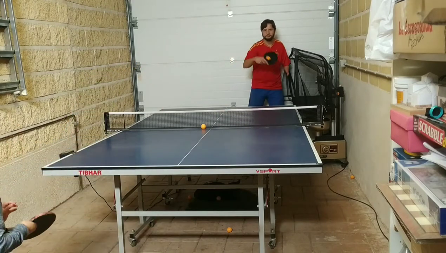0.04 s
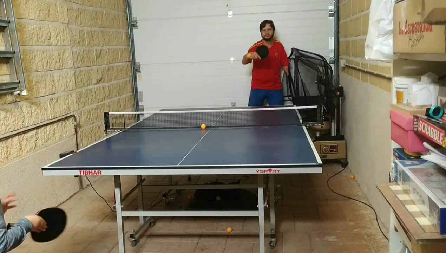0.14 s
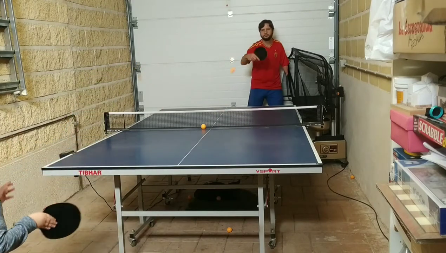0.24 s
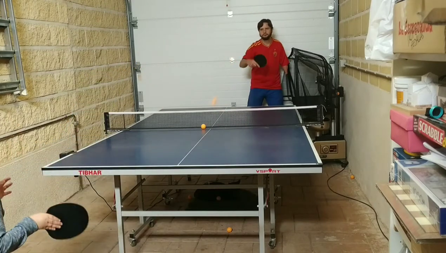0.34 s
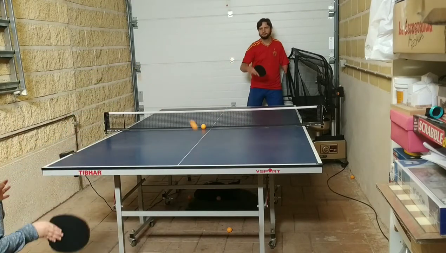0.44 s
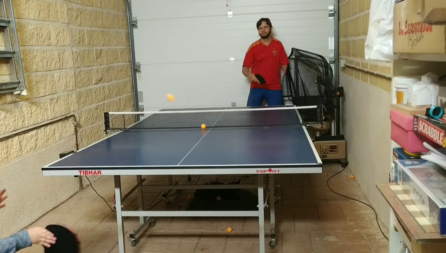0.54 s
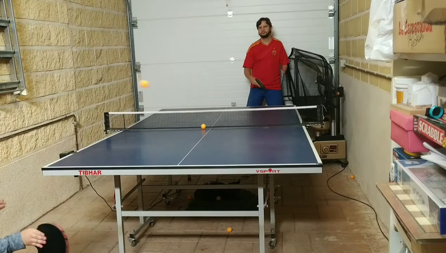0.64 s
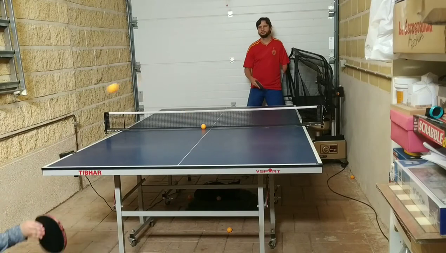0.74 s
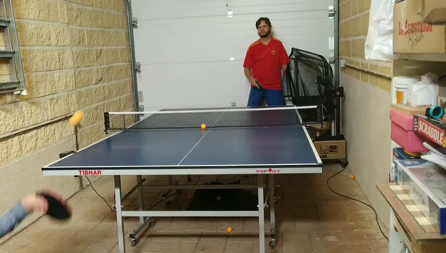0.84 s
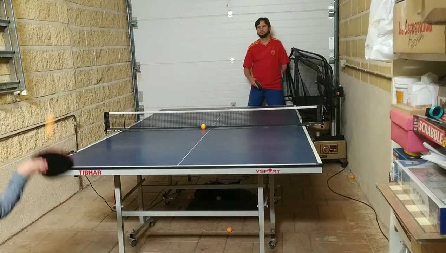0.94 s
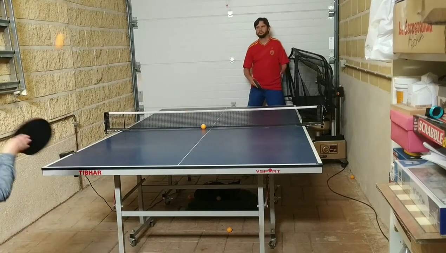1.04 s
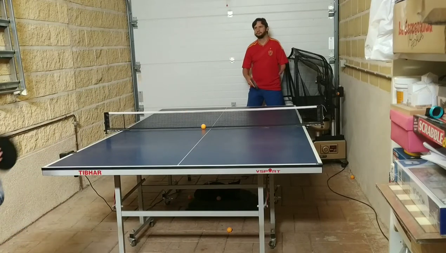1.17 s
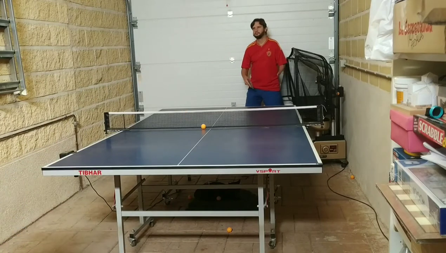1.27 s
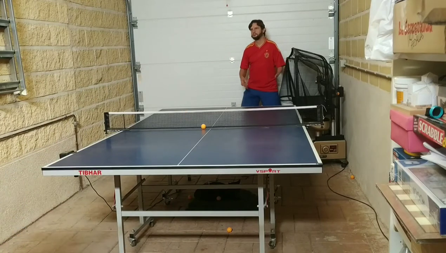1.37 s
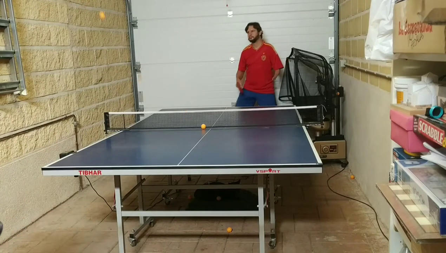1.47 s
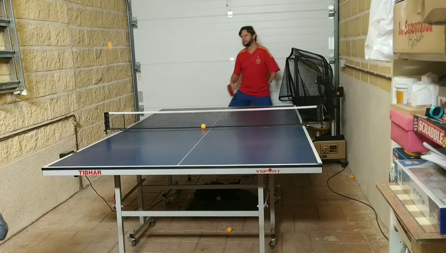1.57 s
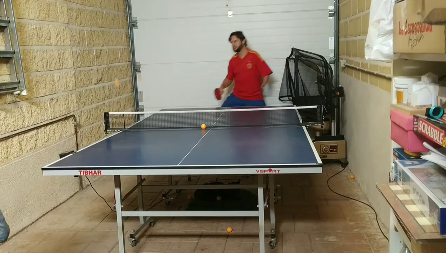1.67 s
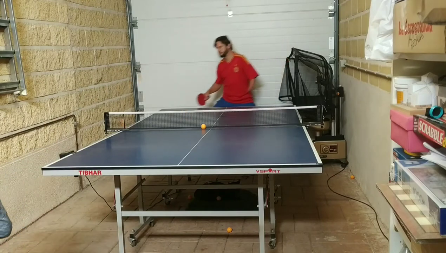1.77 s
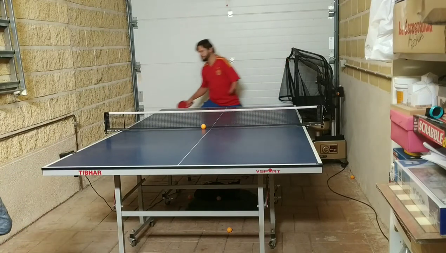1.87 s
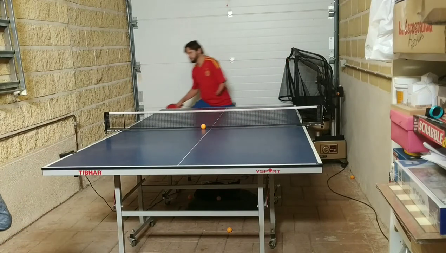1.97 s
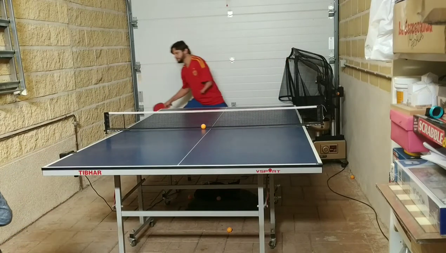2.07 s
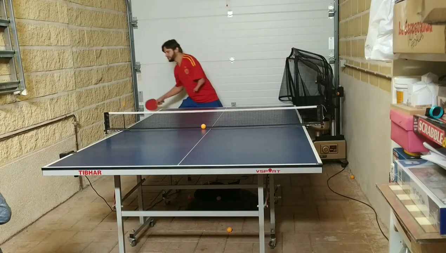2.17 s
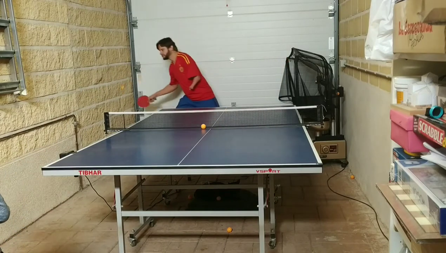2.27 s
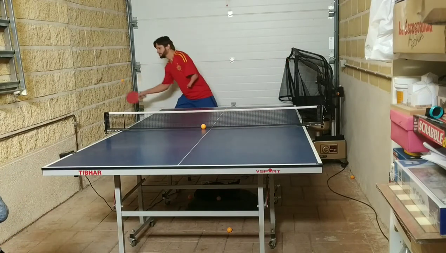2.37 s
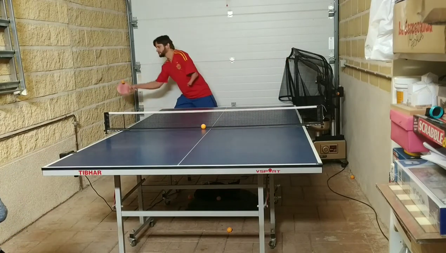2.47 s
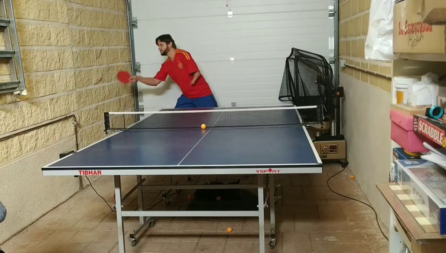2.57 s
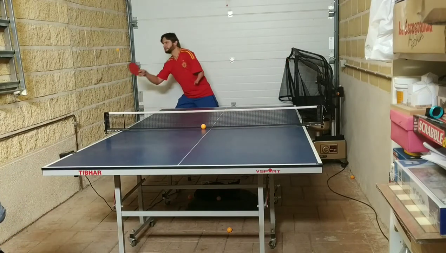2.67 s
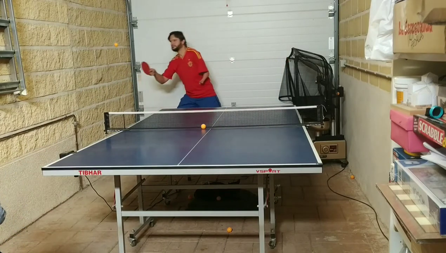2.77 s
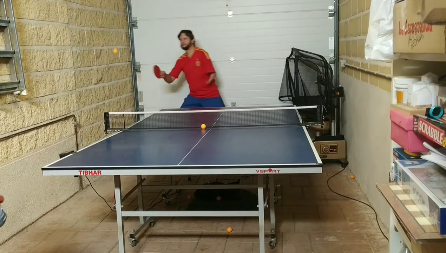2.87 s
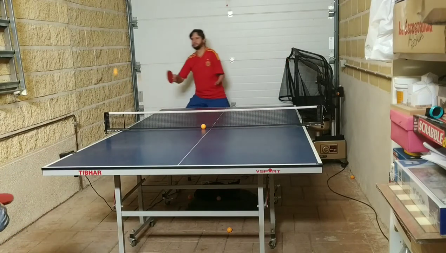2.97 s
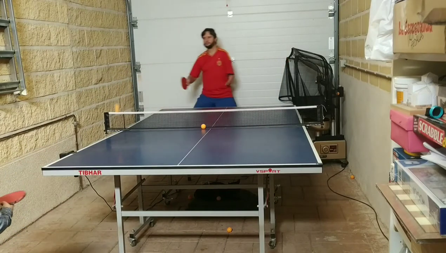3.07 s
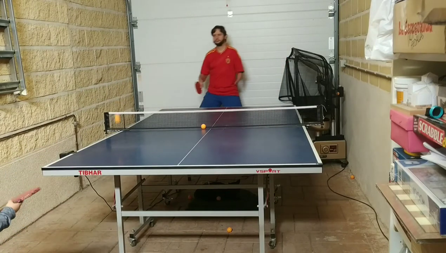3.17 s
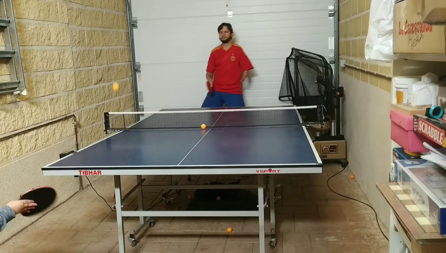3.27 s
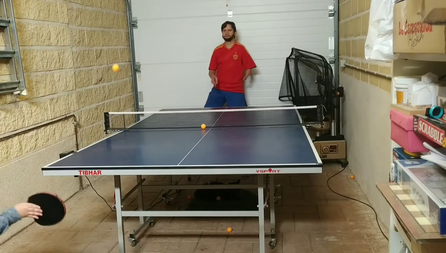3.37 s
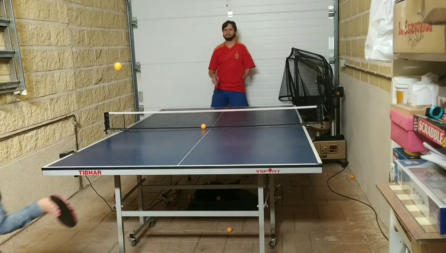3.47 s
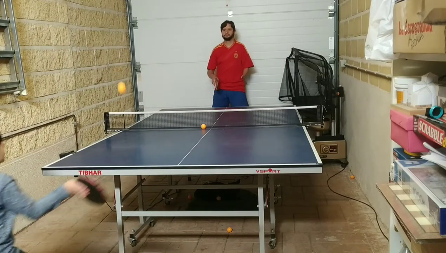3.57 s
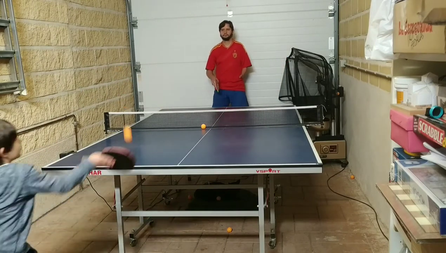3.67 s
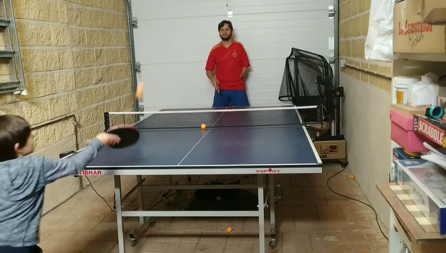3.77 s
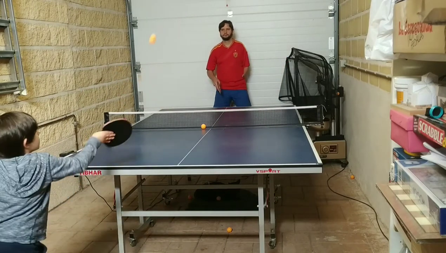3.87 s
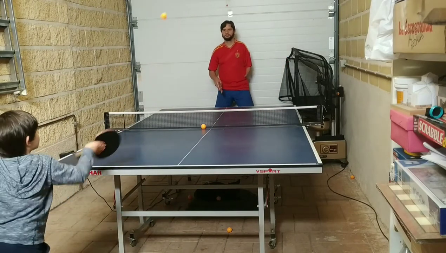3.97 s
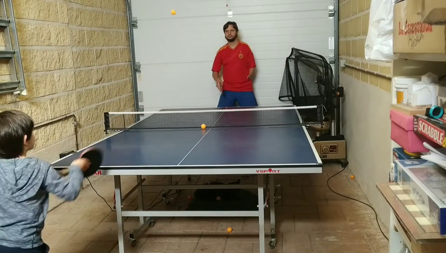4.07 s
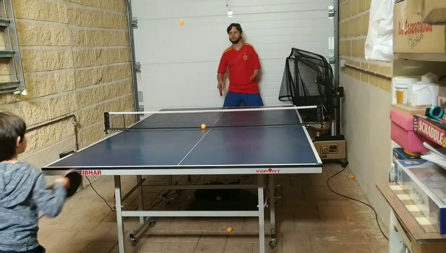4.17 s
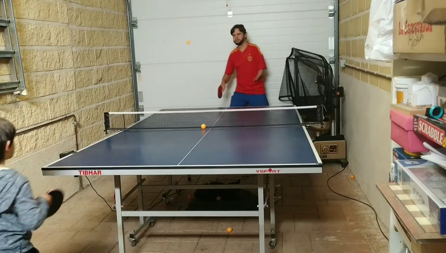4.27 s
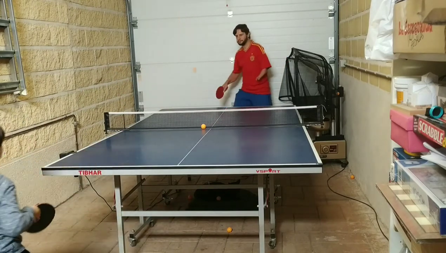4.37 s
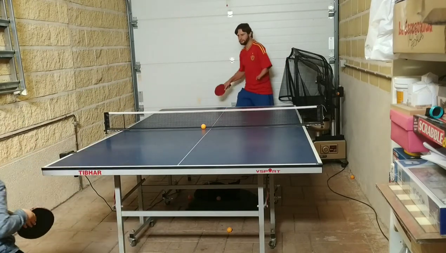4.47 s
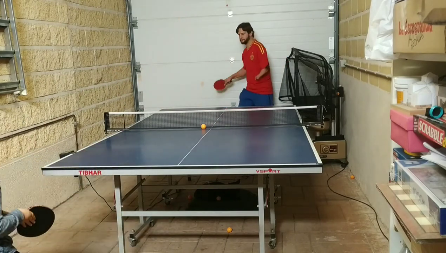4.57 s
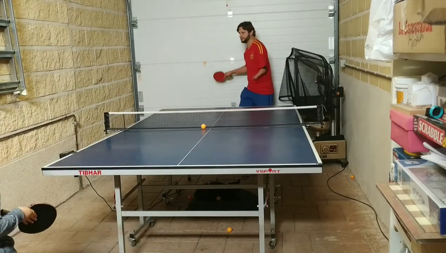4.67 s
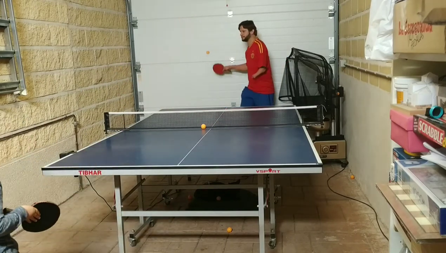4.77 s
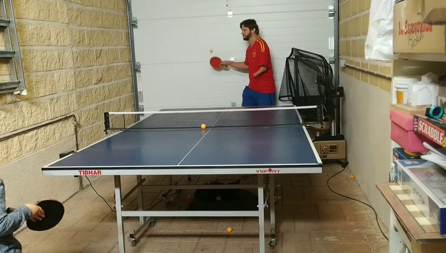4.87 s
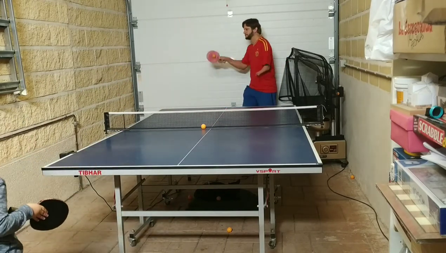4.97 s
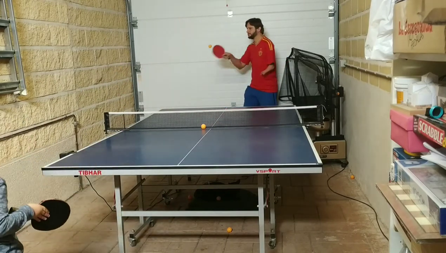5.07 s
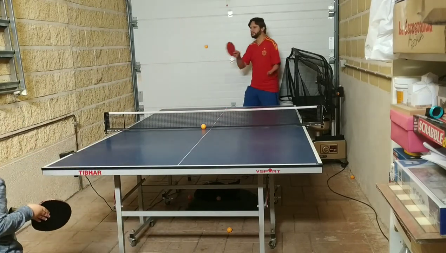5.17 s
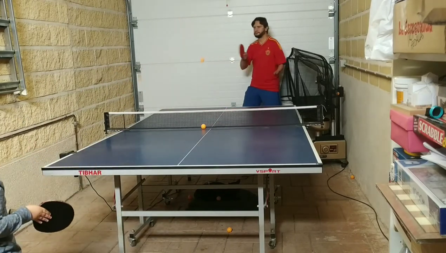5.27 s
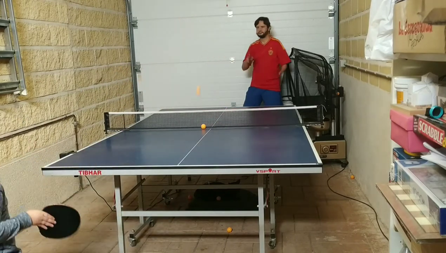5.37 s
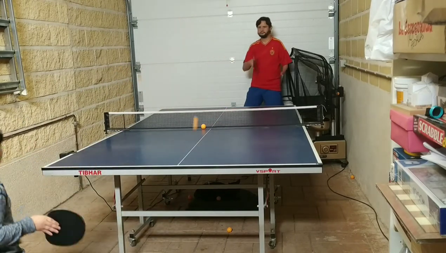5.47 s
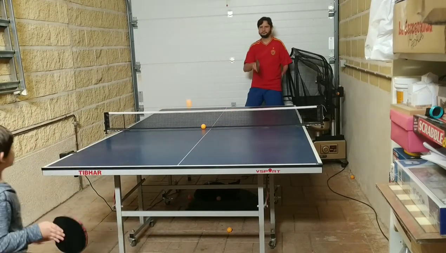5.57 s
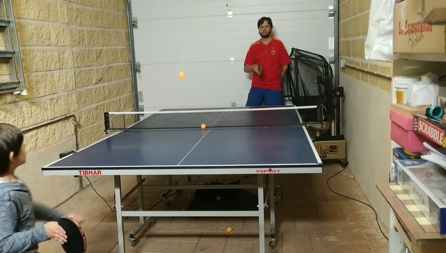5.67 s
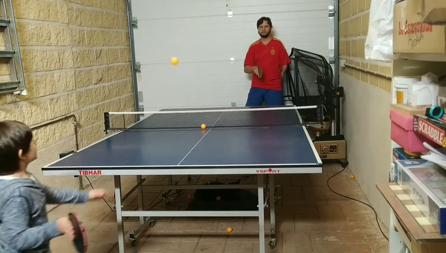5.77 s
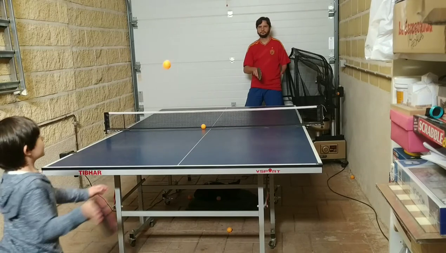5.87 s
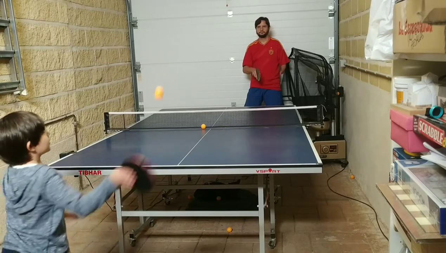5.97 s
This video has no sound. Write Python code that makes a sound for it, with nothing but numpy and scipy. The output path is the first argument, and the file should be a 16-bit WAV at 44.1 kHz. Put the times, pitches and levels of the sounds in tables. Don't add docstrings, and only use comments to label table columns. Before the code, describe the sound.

A ping-pong rally heard from the near end of the table in a small garage. Bright, ringing bounces on the table alternate with softer woody paddle knocks, each followed by about half a second of hard-walled echo. Midway, rubber soles scrape, squeak and thump on gritty concrete as the players move. Low floor rumble lies underneath, and a noise gate drops quiet moments to almost nothing.

```python
import sys
import numpy as np
from scipy import signal
from scipy.fft import rfft, irfft
from scipy.io import wavfile
from scipy.ndimage import uniform_filter1d, minimum_filter1d

SR = 44100
rng = np.random.default_rng(int(sys.argv[2]) if len(sys.argv) > 2 else 0)


def volts_from_decibels(level):
    exponent = np.asarray(level, float) / 20
    return 10 ** exponent


def wav_record(signal):
    frames = np.transpose(np.atleast_2d(signal))
    bounded = np.clip(frames, -1, 1)
    quanta = np.round(bounded * 32767).astype(np.int16)
    wavfile.write(sys.argv[1], SR, quanta)


N = 265923


def rms_one(x):
    return x / np.sqrt(np.mean(x ** 2) + 1e-20)


def at_hz(points, hz):
    points_hz, values = np.array(points)[:, :2].T
    return np.interp(np.log(hz), np.log(points_hz), values)


def band(x, low_hz, high_hz):
    return signal.sosfilt(signal.butter(2, [low_hz, high_hz], "band", fs=SR, output="sos"), x)


def drift(rate_hz, size):
    knots = rng.standard_normal(size // 64 + 500)
    r = np.exp(-128 * np.pi * rate_hz / SR)
    slow = signal.lfilter([1], [1, -2 * r, r * r], knots)[400:]
    return np.interp(np.arange(size) / 64, np.arange(len(slow)), rms_one(slow))


def swell(t, peak_s, swell_s, fade_s, level_db):
    part = (t - peak_s) / np.where(t < peak_s, swell_s, fade_s)
    return volts_from_decibels(level_db - 20 * part ** 2)


def swells(rows):
    t = np.arange(0, N + 64, 64) / SR
    power = sum(swell(t, *row) ** 2 for row in rows)
    return np.interp(np.arange(N) / SR, t, np.sqrt(power))


def trailing(x, seconds):
    size = round(seconds * SR)
    return uniform_filter1d(x, size, origin=(size - 1) // 2)


# pitch_hz, side_minus_mid_db
PORT_SPREAD = [(60, -12), (125, -35), (250, -13), (500, -11.5), (1000, -3.5), (2500, 0.5), (6000, 0),
               (14000, -1)]


def diffuse(size, gain_of_band):
    edges_hz = 40 * 2 ** np.arange(0, 9, .4)
    white = rng.standard_normal((2, 2, size))
    out = 0
    for k, (low_hz, high_hz) in enumerate(zip(edges_hz, edges_hz[1:])):
        mid, side = band(white[k % 2], low_hz, high_hz)
        hz = np.sqrt(low_hz * high_hz)
        wide = volts_from_decibels(at_hz(PORT_SPREAD, hz))
        stereo = (mid + wide * side * [[1], [-1]]) / np.sqrt(1 + wide ** 2)
        out = out + gain_of_band(hz) * stereo
    return out


# start_s, peak_db, body_db, shell_db, direct_over_echoes_db
BOUNCES = [
    (.4718, -11, -13.5, -9, -5),
    (3.1337, -6, -17, -12.5, -2.5),
    (4.537, -6, -14.5, -11.5, -0.3),
    (5.498, -9.5, -12.5, -6, -9),
]
EDGE_BOUNCE = [
    (1.961, -6.5, -23, -6.5, -0.6),
]
# pitch_hz, width_hz, level_db
TABLE_TOP = [(136, 170, -6.5), (260, 60, 3.5), (305.7, 63, 4), (510, 260, 0.5), (770, 210, 3),
             (1220, 650, -1), (2205, 550, -0.5), (3470, 820, -9), (5610, 1500, -14)]
TABLE_EDGE = [(250, 170, -16.5), (496, 180, -11), (747, 180, -5), (1140, 360, 0), (1920, 900, 1.5),
              (2624, 950, -1.5), (3720, 820, 0), (6260, 580, -5)]
BALL_EDGE_ON = [(8153, 650, 1.5), (8464, 760, 0), (9700, 700, -4.5), (10900, 990, -4), (12070, 1000, -6.5),
                (13600, 810, -16), (15170, 1400, -20.5)]


def table_bounces():
    flat = contacts(BOUNCES, TABLE_TOP, trim_db=21.0, tilt_db=0.56)
    return flat + contacts(EDGE_BOUNCE, TABLE_EDGE, trim_db=22.0, tilt_db=0.9, ball=BALL_EDGE_ON)


# start_s, peak_db, body_db, shell_db, direct_over_echoes_db
FAR_STROKES = [
    (.0447, -22, -6.5, -12, -4.5),
]
FAR_DRIVE = [
    (5.0057, -22, -6.5, -10, 1.4),
]
FAR_BACKHAND = [
    (2.4975, -26.5, -7.5, -6.5, -2.13),
]
# pitch_hz, width_hz, level_db
FAR_PADDLE = [(265, 210, -14.5), (582, 81, -7), (737, 55, 7), (1030, 340, -3), (1419, 390, -6.5),
              (2730, 1900, -15), (4600, 6500, -18.5)]
PADDLE_BACK = [(251, 280, -9), (543, 103, -0.5), (747, 57, 2.5), (1050, 205, -2.5), (1400, 250, -7.5),
               (2700, 1640, -15), (4450, 4700, -16), (5980, 550, -12.5)]


def far_paddle():
    strokes = contacts(FAR_STROKES, FAR_PADDLE, trim_db=17.5, tilt_db=-0.05)
    drive = contacts(FAR_DRIVE, FAR_PADDLE, trim_db=17, tilt_db=0.57)
    return strokes + drive + contacts(FAR_BACKHAND, PADDLE_BACK, trim_db=16, tilt_db=1.2)


# start_s, peak_db, body_db, shell_db, direct_over_echoes_db
NEAR_STROKES = [
    (.9497, -20.5, -8.5, -7, 1.8),
]
NEAR_REACH = [
    (3.7398, -17.5, -10.5, -11.5, -1.5),
]
# pitch_hz, width_hz, level_db
NEAR_PADDLE = [(252, 172, -15.5), (608, 98, 1), (1105, 260, -2), (1814, 2800, -13), (3810, 1400, -8.5),
               (5560, 1870, -15)]
PADDLE_TIP = [(305, 204, -12.5), (566, 260, -6.5), (1015, 290, 3), (1540, 530, -3), (2570, 1100, -10.5),
              (4060, 500, -9.5), (6050, 2500, -15)]


def near_paddle():
    strokes = contacts(NEAR_STROKES, NEAR_PADDLE, trim_db=16, tilt_db=-0.2)
    return strokes + contacts(NEAR_REACH, PADDLE_TIP, trim_db=15.0, tilt_db=0.6)


# pitch_hz, width_hz, level_db
BALL_SHELL = [(7370, 1300, -13.5), (8250, 240, -7.5), (8733, 260, 1.4), (9860, 150, -5.5),
              (10560, 580, -5.5), (12430, 1200, -10.5), (13600, 800, -16), (15000, 900, -28)]
# start_s, level_db, left_minus_right_db
ECHOES = [(0.477, -2, 0), (0.4933, 5, 6.5), (0.96, -16, 6), (1.976, 0.2, 6), (1.9833, -9, 6),
          (3.134, 8, 9.5), (3.1403, 6, 1), (3.746, -7, 4.5), (4.552, 3, 4), (5.504, -1.5, 7),
          (5.518, -1, 5)]


def contacts(rows, body, trim_db, tilt_db, ball=BALL_SHELL):
    out = np.zeros((2, N + SR))
    for start_s, peak_db, body_db, shell_db, direct_db in rows:
        shell = volts_from_decibels(shell_db + 17.5) * knock(ball, 0, scatter_db=0.96, count=2)
        blow = shell + volts_from_decibels(body_db + trim_db) * knock(body, tilt_db, scatter_db=0.43)
        heard = signal.fftconvolve(garage(direct_db), blow[None])
        for echo_s, echo_db, pan_db in ECHOES:
            if 0 < echo_s - start_s < .05:
                echo = np.convolve(shell, scattered())
                late = round((echo_s - start_s) * SR)
                heard[:, late:late + len(echo)] += echo * volts_from_decibels(echo_db + pan_db * np.array([[.5], [-.5]]))
        at = round(start_s * SR)
        out[:, at:at + heard.shape[1]] += volts_from_decibels(peak_db) * heard
    return out[:, :N]


def knock(modes, tilt_db, scatter_db, count=1):
    click = np.eye(1, 2048)[0]
    plain, out = 0, 0
    for k, (hz, width_hz, level_db) in enumerate(modes):
        r = np.exp(-np.pi * width_hz * count / SR)
        zeros = (1 - r * r) / 2 * np.array([1, 0, -1])
        poles = [1, -2 * r * np.cos(2 * np.pi * hz / SR), r * r]
        ring = click
        for _ in range(count):
            ring = signal.lfilter(zeros, poles, ring)
        ring = ring * volts_from_decibels(level_db + scatter_db * rng.standard_normal()) * (-1) ** k
        plain = plain + ring
        out = out + ring * volts_from_decibels(tilt_db * np.log2(hz / 800))
    return out / np.sqrt(np.sum(plain ** 2))


def scattered():
    spread = rng.standard_normal(96) * np.exp(-np.arange(96) / SR / .0007)
    return spread / np.sqrt(np.sum(spread ** 2))


# pitch_hz, t60_s
GARAGE_T60 = [(100, 0.65), (400, 0.41), (1000, 0.4), (2800, 0.4), (7300, 0.35), (14000, 0.24)]


def garage(direct_db):
    t = np.arange(round(.55 * SR)) / SR
    lumps = volts_from_decibels(2.5 * np.exp(-t / 0.083) * drift(160, len(t)))
    build_up = volts_from_decibels(2.5 - 5.5 * np.exp(-t / 0.02)) * (1 - np.exp(-t / 0.0013))
    tail = diffuse(len(t), lambda hz: volts_from_decibels(-60 * t / at_hz(GARAGE_T60, hz)))
    out = tail * lumps * build_up * 0.11
    out[:, 0] += volts_from_decibels(direct_db)
    return out


# peak_s, swell_s, fade_s, level_db, brightness_db_per_octave
SLIDES = [(.76, 0.047, 0.15, -62.5, 1), (.882, 0.052, 0.016, -63.5, -4), (1.168, 0.025, 0.013, -56, -5.5),
          (1.285, 0.021, 0.14, -54.5, -1.5), (1.37, 0.13, 0.12, -51.5, -1.6), (1.49, 0.055, .27, -49.5, 1),
          (1.77, 0.15, .2, -47, -1.4), (2.05, 0.13, 0.3, -38, 2.8), (2.27, .2, 0.1, -44, 2.5),
          (2.731, .1, 0.13, -40.5, -0.1), (3.051, 0.12, 0.097, -57.5, 0.3), (3.441, 0.04, 0.13, -48.5, 1.3),
          (3.546, 0.052, 0.13, -46.5, -2.4), (3.68, 0.098, 0.08, -64.5, -3), (3.929, 0.087, 0.067, -65, 2),
          (4.15, 0.016, .04, -61.5, 1), (4.221, 0.082, .13, -56, -1.5), (4.37, 0.049, 0.1, -51.5, -1.2),
          (4.508, 0.04, 0.15, -34.5, 0.7), (4.7, 0.077, 0.13, -45, -2), (5.275, .021, 0.019, -71, 3),
          (5.365, 0.024, 0.029, -63, 1), (5.856, 0.0099, 0.028, -57, 1), (5.979, .021, .05, -64, -3.5)]
# pitch_hz, level_db_per_hz
GRIT = [(410, -28.5), (700, -15.5), (1280, -6.5), (1400, -5), (2200, -3.5), (2410, -3), (7660, 1),
        (14600, -10.5), (16200, -21)]


def slides():
    out = np.zeros((2, N))
    for peak_s, swell_s, fade_s, level_db, tilt_db in SLIDES:
        a = round((peak_s - .3) * SR)
        t = np.arange(a, min(a + SR, N)) / SR
        t = t[t < peak_s + .6]

        def grit_gain(hz):
            return volts_from_decibels(at_hz(GRIT, hz) + tilt_db * np.log2(hz / 5000) + 0.57 * drift(25, len(t)))

        grit = rms_one(diffuse(len(t), grit_gain))
        out[:, a:a + len(t)] += swell(t, peak_s, swell_s, fade_s, level_db) * grit
    return out


# peak_s, swell_s, fade_s, level_db
STEPS = [(.78, .03, 0.18, -70.5), (1.168, 0.027, 0.021, -76.5), (1.33, 0.087, 0.11, -64.5),
         (1.65, 0.45, .15, -65), (1.8, 0.044, 0.16, -49.5), (1.918, 0.059, 0.088, -50.5),
         (2.08, 0.15, 0.12, -59.5), (2.3, 0.22, 0.11, -62.5), (.88, 0.037, 0.013, -64.5),
         (2.62, 0.056, 0.076, -73), (2.86, 0.13, 0.12, -67.5), (3.01, 0.024, 0.16, -57.5),
         (3.43, 0.053, 0.12, -51), (3.6, 0.12, 0.11, -66.5), (3.93, 0.068, 0.045, -64.5),
         (4.15, .015, 0.025, -59), (4.178, .012, 0.066, -58), (4.26, 0.099, 0.077, -57.5),
         (4.42, 0.18, 0.036, -67), (4.69, 0.096, 0.057, -53), (5.81, .04, 0.065, -63)]
# pitch_hz, level_db_per_hz
THUD = [(53, -23.5), (90, -1.5), (329, -0.5), (479, -8), (682, -4), (970, -6), (1290, -5), (1500, -10),
        (1950, -48.5), (3300, -120)]


def steps():
    thud = diffuse(N, lambda hz: volts_from_decibels(at_hz(THUD, hz) + 2.5 * drift(14, N)))
    return swells(STEPS) * rms_one(thud)


# start_s, length_s, pitch_hz, level_db
CATCHES = [
    (1.33, 0.098, 733, -61),
    (1.63, 0.095, 1126, -55),
    (1.75, 0.067, 845, -57.5),
    (1.89, 0.054, 680, -50),
    (5.853, .015, 5000, -63),
    (2.69, 0.15, 1050, -59),
    (2.83, 0.18, 197.4, -64.5),
    (2.995, 0.051, 313, -56.5),
    (4.168, 0.04, 376, -58),
]


def catches():
    out = np.zeros(N)
    for start_s, length_s, hz, level_db in CATCHES:
        rub = band(rng.standard_normal(8192), hz * 0.57, hz * 1.07)
        rub = band(rub, hz * 1.0, hz * 1.1)[2048:]
        phase = np.arange(len(rub)) / SR / length_s
        at = round(start_s * SR)
        out[at:at + len(rub)] += volts_from_decibels(level_db + 8.5) * rms_one(rub) * 4 * phase * np.exp(-4 * phase)
    return out


# peak_s, swell_s, fade_s, level_db
LUNGES = [(.52, 0.1, .13, -51), (.74, 0.16, 0.13, -59), (1.11, 0.45, 0.038, -58), (1.31, 0.094, .07, -65),
          (1.86, 0.11, 0.64, -56), (2.15, .2, 0.23, -67.5), (3.1, 0.21, 0.55, -60), (3.6, .4, 0.14, -57),
          (3.85, 0.18, 0.074, -56.5), (4.19, 0.06, 0.65, -57.5), (4.77, .2, 0.11, -56.5),
          (5.54, 0.087, 0.16, -54.5)]


def rumble():
    white = rng.standard_normal((3, N))
    mid, side = band(band(white[:2], 5.3, 34), 3.8, 110)
    hum = volts_from_decibels(-13.5) * rms_one(band(band(white[2], 185, 215), 170, 230))
    low = rms_one(mid) + hum + .28 * rms_one(side) * [[1], [-1]]
    return np.hypot(volts_from_decibels(-65.5), swells(LUNGES)) * low


# pitch_hz, level_db_per_hz
ROOM_TONE = [(100, -2.5), (300, -7), (1000, -7.5), (3000, -7), (8000, -10), (16000, -9)]


def room_tone():
    return volts_from_decibels(-66) * rms_one(diffuse(N, lambda hz: volts_from_decibels(at_hz(ROOM_TONE, hz))))


# pitch_hz, level_db_per_hz
HISS = [(29, -30), (50, 3), (108, -4.5), (681, -26), (847, -18), (1710, -21), (6950, -22.5), (11500, -23.5),
        (13300, -29.5), (16200, -28)]


def background():
    flutter_db = 4 * np.tanh(drift(25, N))
    return volts_from_decibels(-81 + flutter_db) * rms_one(diffuse(N, lambda hz: volts_from_decibels(at_hz(HISS, hz))))


def scene():
    ball = table_bounces() + far_paddle() + near_paddle()
    shoes = slides() + steps() + catches()
    return ball + shoes + rumble() + room_tone()


# pitch_hz, left_minus_right_db
LEFT_LEAN = [(60, 0.5), (110, -0.5), (200, 0.5), (380, -0.5), (700, -1), (1290, 0), (2380, -1.5),
             (4400, -0.5), (8120, 1.5), (15000, 1.5)]


def two_ports(dry):
    hz = np.fft.rfftfreq(N, 1 / SR) + 1
    lean = volts_from_decibels(at_hz(LEFT_LEAN, hz) * np.array([[.5], [-.5]]))
    lag = np.exp(-2j * np.pi * hz * np.array([[.0002], [0]]))
    return irfft(rfft(dry) * lean * lag, N)


def noise_gate(ports):
    threshold_db, ratio, depth_db, listen_s = -56, 2.3, 38, 0.02
    rumble_depth_db, rumble_s = 13, .04
    low = signal.sosfiltfilt(signal.butter(2, 55, fs=SR, output="sos"), ports)
    high = ports - low
    power = trailing(np.mean(high ** 2, axis=0), listen_s)
    level_db = 10 * np.log10(np.abs(power) + 1e-14)
    shut_db = np.clip(ratio * (threshold_db - level_db), 0, depth_db)
    gain = volts_from_decibels(-uniform_filter1d(minimum_filter1d(shut_db, size=200), size=200))
    low_gain = volts_from_decibels(-trailing(np.minimum(shut_db, rumble_depth_db), rumble_s))
    return low_gain * low + gain * high


def dropouts(x, share, depth_db):
    hz, _, cells = signal.stft(x, SR, nperseg=1024)
    chance = uniform_filter1d(rng.standard_normal(cells.shape[1:]), size=6, axis=0)
    chance = uniform_filter1d(chance, size=5, axis=1)
    treble = hz > 2500
    loud_db = 10 * np.log10(np.mean(np.abs(cells[:, treble]) ** 2, axis=(0, 1)) + 1e-14)
    chance = rms_one(chance) - .02 * loud_db - .2 * np.log2(hz / 6000 + .01)[:, None]
    unlucky = chance < np.quantile(chance[treble], share)
    no_attack = np.gradient(loud_db) < 5
    muted = unlucky & treble[:, None] & no_attack
    gain = np.where(muted, volts_from_decibels(-depth_db), 1)
    return signal.istft(cells * gain, SR, nperseg=1024)[1][:, :N]


def low_pass(x):
    return signal.sosfilt(signal.butter(12, 16640, fs=SR, output="sos"), x)


def record(dry):
    gated = noise_gate(two_ports(dry)) + background()
    kept = dropouts(gated, share=.11, depth_db=30)
    mix = signal.sosfilt(signal.cheby2(10, 50, 16500, fs=SR, output="sos"), kept)
    return low_pass(mix)


dry = scene()
out = record(dry)
wav_record(out)
```